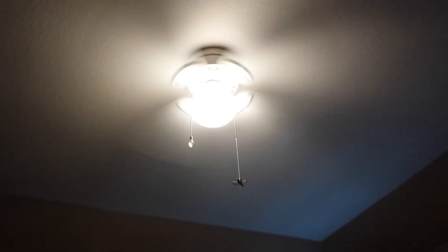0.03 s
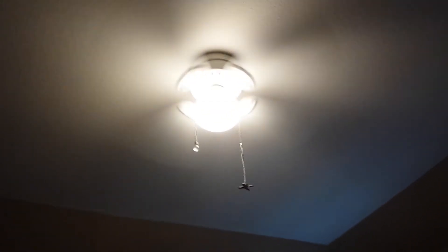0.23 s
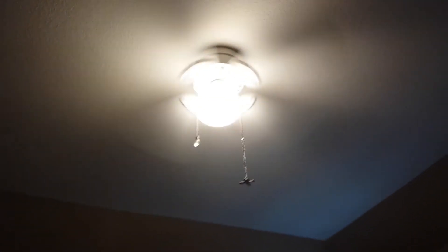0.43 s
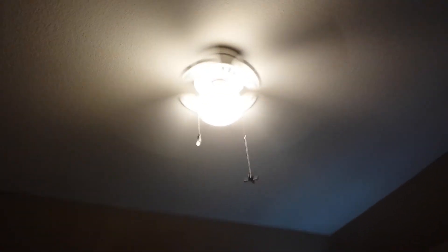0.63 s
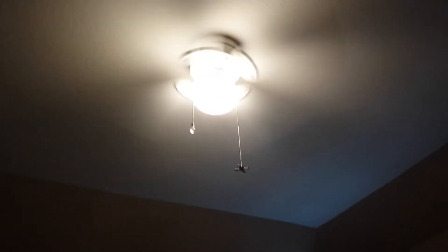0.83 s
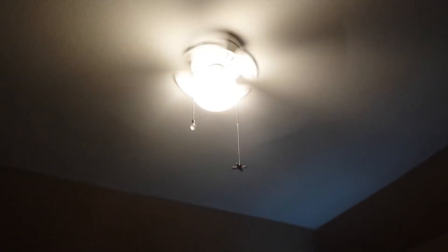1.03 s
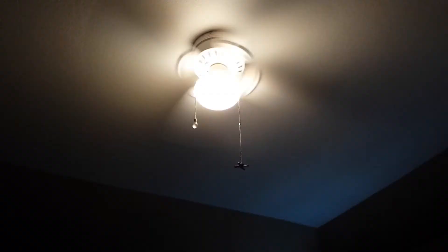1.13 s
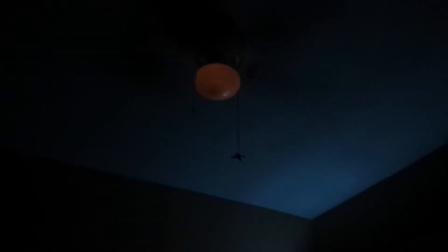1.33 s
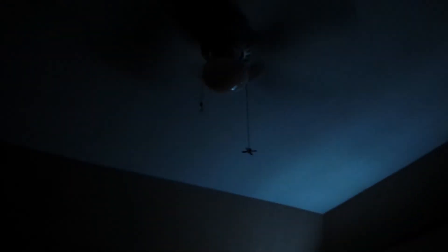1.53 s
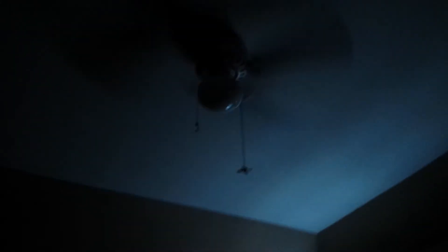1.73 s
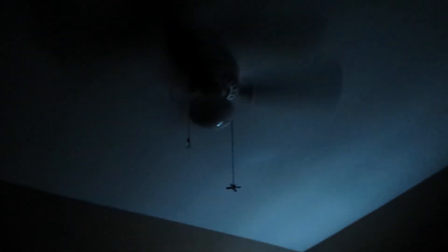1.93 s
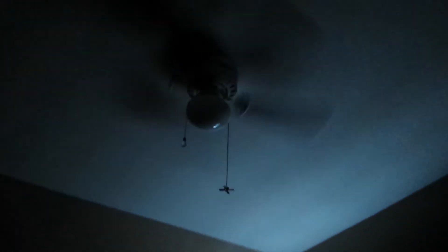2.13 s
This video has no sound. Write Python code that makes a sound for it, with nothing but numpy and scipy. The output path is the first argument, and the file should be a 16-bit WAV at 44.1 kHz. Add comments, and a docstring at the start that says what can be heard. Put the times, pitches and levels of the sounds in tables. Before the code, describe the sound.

A light switch snaps loudly in a small, lively room, followed half a second later by a much quieter plastic click; a faint ceiling fan hums and slows beneath, with soft handling bumps at the start.

```python
"""A wall switch creaks and snaps off in a small room; a smaller plastic click follows half a second later.
Each is a run of short noise contacts plus decaying sine modes; echoes and a noise tail make the room.
A ceiling fan hums on two sines that die away from just before the snap; its air is coloured noise that
sinks as the blades coast. Soft bumps and faint ticks come from the hand holding the phone."""
import sys
import numpy as np
from scipy import signal
from scipy.fft import rfft, irfft
from scipy.io import wavfile

SR = 44100
rng = np.random.default_rng(int(sys.argv[2]) if len(sys.argv) > 2 else 0)


def bounce(signal):
    """Save signal as a 16-bit WAV file at the path given by the first command-line argument."""
    frames = np.transpose(np.atleast_2d(signal))
    limited = np.clip(frames, -1, 1)
    pcm = np.round(limited * 32767).astype(np.int16)
    wavfile.write(sys.argv[1], SR, pcm)


N = 96799

ROOM_BUILD_S = 0.00097  # time constant of the onset of every ring
ROOM_RIGHT_DB = -1  # right port: level of room and rings


def undb(db):
    """Decibels to gain."""
    return 10 ** (np.asarray(db) / 20)


def unit(x):
    """Scale to rms 1."""
    return x / np.sqrt(np.mean(x ** 2))


def by_hz(points):
    """Interpolate (Hz, value) rows over log frequency, one value per FFT bin."""
    hz, value = np.array(points, float).T
    bin_hz = np.arange(N // 2 + 1) * SR / N
    return np.interp(np.log(bin_hz + 1), np.log(hz), value)


def colour(x, points):
    """Minimum-phase filter with the given (Hz, dB) response, by folding the cepstrum."""
    cepstrum = irfft(np.log(undb(by_hz(points))), N)
    fold = np.r_[1, np.full(N // 2, 2), np.zeros(N - N // 2 - 1)]
    response = np.exp(rfft(cepstrum * fold))
    return irfft(rfft(x) * response, N)


def lowpass(x, hz):
    """Second-order low-pass."""
    sos = signal.butter(2, min(hz, SR / 2 - SR / 20), fs=SR, output="sos")
    return signal.sosfilt(sos, x)


def resonance(x, hz, width_hz):
    """Band-pass with gain 1 at its centre."""
    b, a = signal.iirpeak(hz, hz / width_hz, fs=SR)
    return signal.lfilter(b, a, x)


def since(start_s):
    """Seconds since a moment, zero before it."""
    return np.maximum(np.arange(N) / SR - start_s, 0)


def fade(age_s, t60_s):
    """Exponential decay, 60 dB down at t60."""
    return np.exp(-np.log(1000) * age_s / t60_s)


def stereo_noise(likeness):
    """White noise from mid and side, mixed so left and right agree as the (Hz, 0-1) table says."""
    c = np.clip(by_hz(likeness), -1, 1)
    gains = np.sqrt([(1 + c) / 2, (1 - c) / 2])
    mid, side = rfft(rng.standard_normal((2, N))) * gains
    return irfft(np.array([mid + side, mid - side]), N)


def contact(start_s, length_s, size=1024):
    """A brief rough contact: a dying noise burst of unit energy with a nearly even spectrum."""
    shape = np.exp(-np.arange(size) / SR / length_s)
    burst = rng.standard_normal(size) * shape
    for _ in range(2):
        flat = irfft(np.exp(1j * np.angle(rfft(burst))))
        burst = flat * np.sqrt(shape)
    burst = burst / np.linalg.norm(burst)
    return np.pad(burst, (max(int(start_s * SR), 0), N))[:N]


def room_tail():
    """Dense ring of the walls: noise bands, each dying at its own rate, at unit energy per side."""
    # centre_hz, t60_s
    band_t60 = [(150, 0.58), (500, 0.44), (1200, .33), (3500, 0.3), (7000, 0.28), (13000, 0.33)]
    # freq_hz, left-right likeness 0-1
    tail_likeness = [(150, 0.93), (350, 0.82), (700, 0.32), (1500, 0)]
    t = since(0)
    noise = rfft(stereo_noise(tail_likeness))
    tail = 0
    for k, (_, t60_s) in enumerate(band_t60):
        band = by_hz([(row[0], j == k) for j, row in enumerate(band_t60)])
        tail = tail + irfft(noise * band, N) * fade(t, t60_s)
    build = 1 - np.exp(-t / ROOM_BUILD_S)
    return unit(tail * build) / np.sqrt(N)


def first_echoes():
    """Smeared, dulled reflections from the nearest surfaces, slightly offset between the ports."""
    # delay_s, level_db before dulling
    echoes = [(.0016, -7.5), (.0068, -18.5), (.0086, -2), (.0098, -6), (0.0135, -8.5), (0.0184, -14.5)]
    spread_s, smear_s, dull_hz = 0.0004, 0.0015, 9100
    early = 0
    for delay_s, level_db in echoes:
        echo = undb(level_db) * contact(delay_s, smear_s)
        offset = int(rng.uniform(-0.86, 1) * spread_s * SR)
        early = early + np.array([echo, np.roll(echo, offset)])
    return lowpass(early, dull_hz)


def room(x, wet_db):
    """Direct sound, reaching the left port first, plus its convolution with near echoes and wall ring."""
    tail_db, port_lag_s, right_db = 3, 0.000356, -5.5
    walls = room_tail() * undb(tail_db) + first_echoes()
    wet = undb(wet_db) * signal.fftconvolve(x[None], walls, axes=1)[:, :N]
    late = np.roll(x, int(port_lag_s * SR))
    left = x + wet[0]
    right = undb(right_db) * late + undb(ROOM_RIGHT_DB) * wet[1]
    return np.array([left, right])


def ring_modes(start_s, modes):
    """Struck modes as decaying sines; each port hears a mode at its own phase."""
    scatter_rad_per_hz = 0.0012
    age = since(start_s)
    ring = 0
    for hz, level_db, t60_s in modes:
        scatter = np.clip(hz * scatter_rad_per_hz, 0, np.pi / 2) * rng.choice([-1, 1])
        phase = 2 * np.pi * (hz * age + rng.random()) + np.array([[0], [scatter]])
        ring = ring + undb(level_db) * np.sin(phase) * fade(age, t60_s)
    build = 1 - np.exp(-age / ROOM_BUILD_S)
    return ring * build * undb([[0], [ROOM_RIGHT_DB]])


def snap(contacts, tone, crack_db, modes, ring_db, wet_db):
    """Plastic parts strike in quick succession; the hardest contact sets the modes ringing."""
    crack = 0
    for start_s, level_db, length_s, dull_hz in contacts:
        crack = crack + undb(level_db) * lowpass(contact(start_s, length_s), dull_hz)
    hardest = max(contacts, key=lambda row: row[1])
    ring = ring_modes(hardest[0], modes)
    return room(undb(crack_db) * colour(crack, tone), wet_db) + undb(ring_db) * ring


def motor_hum():
    """Steady motor sines, dying exponentially once the power is off."""
    # pitch_hz, level_db (rms before the decay)
    hum_partials = [(120, -81), (240.3, -66.5)]
    off_s, t60_s = 1.08, 0.58
    t = since(0)
    hum = 0
    for hz, level_db in hum_partials:
        hum = hum + undb(level_db) * np.sqrt(2) * np.sin(2 * np.pi * (hz * t + rng.random()))
    return hum * fade(since(off_s), t60_s)


def moving_air():
    """Fan air and room hiss: coloured noise split in two bands that sink separately as the blades coast."""
    # freq_hz, relative level_db
    air_colour = [(25, -28.5), (50, -7), (95, -11), (125, -4.5), (175, -16), (260, -8), (400, -10),
                  (650, -9.5), (900, -16), (1400, -22), (2300, -27.5), (4200, -31.5), (6400, -28),
                  (9000, -34), (15500, -35.5)]
    # freq_hz, left-right likeness 0-1
    air_likeness = [(40, 0.8), (140, 0.81), (300, 0.93), (700, 0.8), (1500, 0), (10000, 0)]
    # time_s, body_db, hiss_db
    air_level = [(0, 2, 4), (.65, -1, 0), (1.26, 0, 0.5), (1.46, -3.5, -0.5), (1.68, -4, -1),
                 (1.96, -6, -3.5), (2.19, -7.5, -4)]
    base_db, split_hz = -61.5, 2800  # base: rms before the level curves
    air = undb(base_db) * unit(colour(stereo_noise(air_likeness), air_colour))
    below_split = by_hz([(split_hz / 2, 1), (split_hz * 2, 0)])
    body = irfft(rfft(air) * below_split, N)
    hiss = air - body
    t = since(0)
    times_s, body_db, hiss_db = np.array(air_level).T
    return body * undb(np.interp(t, times_s, body_db)) + hiss * undb(np.interp(t, times_s, hiss_db))


def fan():
    """Ceiling fan: air noise plus motor hum, the hum alike on both sides."""
    return moving_air() + motor_hum()


def hand_bumps():
    """Soft bumps on the phone's body: low resonant noise that swells and dies, peaking at half its length."""
    # start_s, level_db (rms before the swell), length_s
    bump_rows = [(.004, -42, 0.019), (0.035, -49, 0.015), (0.094, -47, 0.027), (0.19, -51.5, 0.021),
                 (0.285, -56, 0.035), (0.351, -56, 0.029), (0.633, -58, 0.023)]
    centre_hz, width_hz, dull_hz, right_db = 53.8, 33, 148, -7.5
    bumps = 0
    for start_s, level_db, length_s in bump_rows:
        age = since(start_s) / length_s
        swell = 2 * age * np.exp(1 - 2 * age)
        rumble = lowpass(resonance(rng.standard_normal((2, N)), centre_hz, width_hz), dull_hz)
        bumps = bumps + undb(level_db) * unit(rumble) * swell
    return bumps * undb([[0], [right_db]])


def handling_ticks():
    """Faint handling ticks: short contacts through two equal band-passes, heard in the room."""
    # start_s, level_db (before the band-passes), centre_hz, width_hz (of each band-pass)
    tick_rows = [(0.27, -32.5, 7180, 3940), (0.3832, -19.5, 2040, 1040), (0.389, -13.5, 1296, 507),
                 (.409, -26, 1410, 630), (.433, -29, 1510, 700)]
    ticks = 0
    for start_s, level_db, hz, width_hz in tick_rows:
        tick = contact(start_s, length_s=0.00093)
        for _ in range(2):
            tick = resonance(tick, hz, width_hz)
        ticks = ticks + undb(level_db) * tick
    return room(ticks, wet_db=-7.5)


def small_click():
    """The smaller plastic click: two contacts and a faint ring."""
    # start_s, relative level_db, length_s, dull_above_hz
    click_contacts = [(1.6938, 6.5, .002, 11000), (1.7003, -8, 0.0022, 3500)]
    # freq_hz, level_db
    click_colour = [(100, -16), (250, -4.5), (650, -0.5), (1200, -3), (1700, 4.5), (2400, -6), (3300, -4.5),
                    (5500, -7.5), (7400, -6), (11000, -22.5), (15500, -22)]
    # pitch_hz, relative level_db, t60_s
    click_modes = [(460, -8, .28), (656, -5, .28), (1090, -10, .22), (1686, 3.5, .2), (1965, -8, .24),
                   (2837, -8, .2), (3054, 1, .13), (3480, 7, .055), (7280, 13, .02)]
    return snap(click_contacts, click_colour, -20, click_modes, ring_db=-53.5, wet_db=-2)


def wall_switch():
    """Lever starts, spring tips over, snap, then a weaker, duller echo about 9 ms later; cover plate and wall
    ring."""
    # start_s, relative level_db, length_s, dull_above_hz
    switch_contacts = [(1.2148, -30, 0.0017, 4000), (1.2165, -18, 0.0018, 8400), (1.2323, 6, 0.0012, 14000),
                       (1.2412, -8.5, 0.0013, 7000)]
    # freq_hz, level_db
    switch_colour = [(60, -23), (170, -6), (300, -0.5), (420, -5.5), (700, 1.5), (1100, 1), (1650, -5),
                     (2200, -2.5), (2850, -4), (3600, -1.5), (4150, -4.5), (5400, -2), (7200, -2.5),
                     (10500, -21), (15500, -24.5)]
    # pitch_hz, relative level_db, t60_s
    plate_modes = [(180, -12, .25), (300, -8, .25), (511, -4, .25), (651, -5, .26), (710, -7, .22),
                   (810, -5, .22), (975, -1, .34), (1089, -5, .27), (1264, -2, .24), (2464, -9, .22),
                   (2830, 12, .02), (3024, -6, .26), (3400, -8, .22), (3560, -6, .2), (5398, -2, .2),
                   (5520, 21, .009), (6450, -8, .32)]
    return snap(switch_contacts, switch_colour, -1, plate_modes, ring_db=-35, wet_db=0)


def scene():
    """Fan, hand on the phone, smaller click and switch."""
    return fan() + hand_bumps() + handling_ticks() + small_click() + wall_switch()


def record(dry):
    """The phone cuts the top with a steep elliptic low-pass."""
    top_hz = 15750
    sos = signal.ellip(10, 0.2, 70, top_hz, fs=SR, output="sos")  # order, ripple dB, stop-band dB
    return signal.sosfilt(sos, dry)


dry = scene()
out = record(dry)
bounce(out)
```